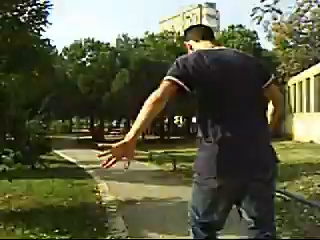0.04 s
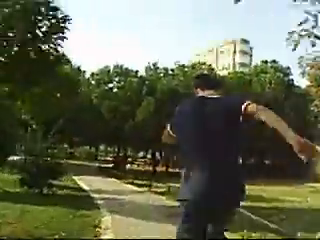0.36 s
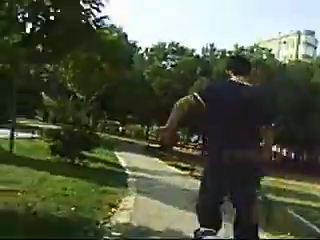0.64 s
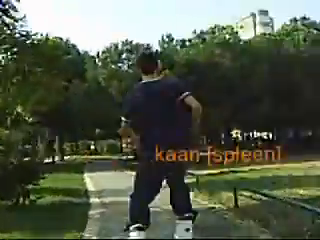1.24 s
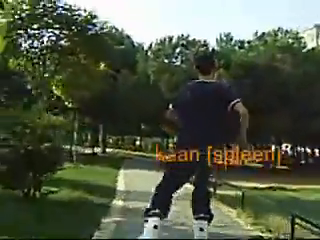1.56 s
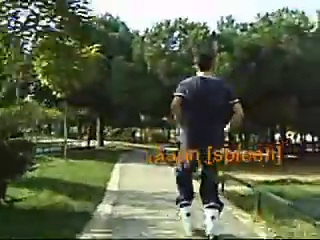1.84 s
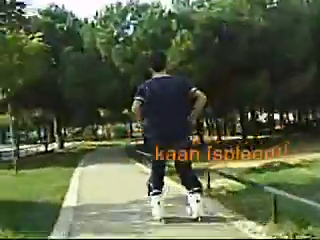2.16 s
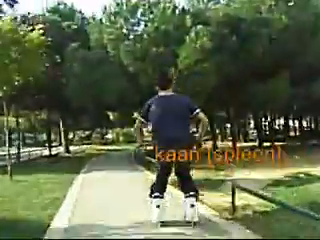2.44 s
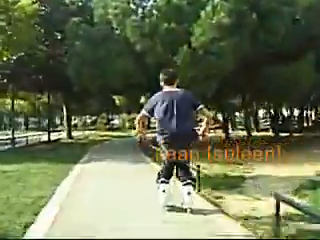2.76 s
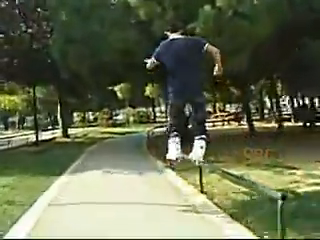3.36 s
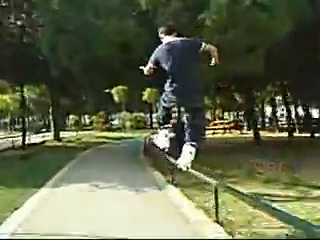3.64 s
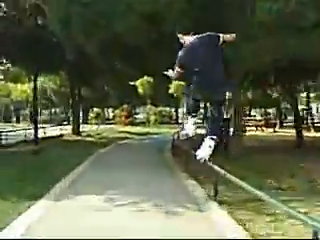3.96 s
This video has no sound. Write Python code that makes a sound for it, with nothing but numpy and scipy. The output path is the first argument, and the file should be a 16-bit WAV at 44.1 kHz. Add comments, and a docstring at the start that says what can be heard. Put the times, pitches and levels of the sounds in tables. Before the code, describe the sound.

Inline skates roll and clack along a paved path, then strike a steel rail.

```python
"""A short pop, then inline skates rolling on a paved park path, followed by a small camera.
Stones in the paving drive the wheels' hum and crackle; the skates slap, clack and scuff with each stride.
Near 3.3 s the frames hit a steel rail, which rings briefly while the rolling goes on."""
import sys
import numpy as np
from scipy import signal
from scipy.fft import rfft, irfft
from scipy.io import wavfile

SR = 44100
rng = np.random.default_rng(int(sys.argv[2]) if len(sys.argv) > 2 else 0)


def wav_record(signal):
    """Record a signal, one row per channel, as 16-bit PCM in the file named by sys.argv[1]."""
    frames = np.transpose(np.atleast_2d(signal))
    bounded = np.clip(frames, -1, 1)
    # unit amplitude maps onto the largest positive 16-bit level
    quanta = np.round(bounded * 32767).astype(np.int16)
    wavfile.write(sys.argv[1], SR, quanta)


N = 176400
T = np.arange(N) / SR
LEAD_S = .008
HIT_T = T[:SR // 20] - LEAD_S  # contact time axis, 0 at the peak

# wheel resonance, rising as a stride loads the wheels: t/s, f/Hz
WHEEL_PITCH = [(.37, 480), (.44, 500), (.6, 516), (.9, 443), (1.3, 476), (1.45, 580), (1.72, 646),
               (1.95, 527), (2.33, 482), (2.47, 590), (2.55, 624), (2.75, 505), (2.96, 504), (3.1, 520),
               (3.21, 542), (3.3, 482), (3.42, 493), (3.65, 470), (3.88, 498), (4, 450)]
# wheel hum: t/s, level/dB
HUM_LEVEL = [(.17, -49), (.36, -75), (.378, -29.5), (.49, -35), (.9, -39), (1.12, -45), (1.395, -53),
             (1.42, -33.5), (1.69, -35), (1.77, -41.5), (2.41, -46.5), (2.51, -29.5), (2.79, -36),
             (2.87, -32), (2.98, -31.5), (3.03, -33), (3.11, -32), (3.25, -32), (3.62, -34), (3.84, -33),
             (3.91, -31), (4, -33.5)]
# grit under the wheels: t/s, level/dB
GRIT_LEVEL = [(.17, -40.5), (.35, -39.5), (.385, -32.5), (.5, -35.5), (.66, -39), (.86, -39), (1.12, -38),
              (1.38, -41), (1.43, -33.5), (1.6, -41.5), (1.68, -38), (1.79, -39.5), (1.98, -39),
              (2.28, -38.5), (2.41, -37), (2.45, -34), (2.75, -35.5), (3.4, -36.5), (4, -35)]
# rasp of wheels pushed sideways: t/s, level/dB
RASP_LEVEL = [(.17, -46), (.4, -58), (.7, -58), (1.35, -43.5), (1.44, -36), (1.7, -39.5), (1.82, -48.5),
              (1.95, -36), (2.35, -44.5), (2.52, -38.5), (2.8, -48), (3.25, -37.5), (4, -55)]
# loaded skate set down: t/s, slap/dB, wheel f/Hz, thud/dB, boom/dB
LANDINGS = [(.3715, -22.5, 497, -23, -50), (1.4105, -16.5, 650, -21.5, -45.5),
            (2.4272, -21, 475, -29, -42.5)]
# wheels and frames striking: t/s, crack/dB, shell f/Hz, shell/dB, thud/dB
CLACKS = [(0.1728, -30, 2020, -42, -35), (0.214, -33.5, 1840, -33, -35.5), (0.3934, -29, 2070, -35, -34),
          (.4142, -31, 2780, -31.5, -48), (0.53, -17.5, 2080, -17.5, -32), (0.66, -36, 2060, -35, -40),
          (.951, -35, 2100, -36.5, -33.5), (1.0738, -38, 1750, -36, -33), (1.1398, -44, 1910, -38.5, -55),
          (1.2502, -38, 1800, -39, -29.5), (1.282, -27, 2120, -26.5, -33.5), (1.3941, -38, 1430, -37, -50),
          (1.556, -39, 1820, -35, -34), (1.685, -38.5, 2000, -35, -40), (1.911, -40, 2450, -39.5, -32.5),
          (2.059, -37, 2120, -38, -39), (2.3693, -39, 1890, -36, -38), (2.4984, -40, 1920, -38, -37),
          (2.898, -34, 2070, -31, -55), (3.5192, -38, 2110, -37, -56)]
# sideways skids: peak t/s, level/dB, rise/s, decay/s
SCUFFS = [(.43, -40.5, 0.037, 0.14), (0.747, -27.5, 0.014, 0.03), (1.245, -34.5, 0.03, 0.045),
          (1.5, -44, 0.052, 0.21), (1.909, -36.5, 0.0018, 0.087), (2.13, -42.5, 0.017, 0.043)]
# frames hitting the rail: t/s, level/dB, shell f/Hz, shell/dB
RAIL_HITS = [(3.2838, -24.5, 1900, -30), (3.2924, -23, 1820, -29.5), (3.2952, -23, 1910, -22),
             (3.2981, -27, 2100, -39), (3.304, -24, 2580, -25), (3.3303, -32.5, 2000, -34)]
# wheels dropping over dips: t/s, f/Hz, level/dB
BUMPS = [(.411, 406, -24), (.438, 430, -30), (1.648, 653, -29), (2.535, 660, -24.5), (2.557, 208, -31),
         (2.911, 480, -27), (2.931, 435, -27), (2.979, 498, -22), (3.165, 534, -27.5), (3.209, 590, -24),
         (3.372, 517, -29), (3.908, 425, -28)]
# single stones snapping: t/s, level/dB
TICKS = [(.3708, -27.5), (.4395, -45), (.455, -39), (.4675, -34), (.508, -37), (.617, -40), (.7456, -29.5),
         (1.19, -39), (1.2125, -41), (1.233, -41), (1.2446, -26), (1.484, -38), (1.615, -41),
         (1.649, -39.5), (1.963, -38), (1.98, -37), (2.132, -40)]

# plastic shell modes: pitch ratio, gain/dB
SHELL_MODES = [(1.001, 9), (1.21, -1), (1.6, -9), (2.72, -5.5)]
# wheel modes: pitch ratio, gain/dB
WHEEL_MODES = [(.58, -7.5), (1, 3), (1.55, -4.5), (2.2, -2.5)]
# steel rail modes: f/Hz, gain/dB, t60/s
RAIL_MODES = [(1860, -4, 0.19), (2000, -6, .15), (2380, -10, 0.34), (2680, -6, .18), (3000, -7, 0.27),
              (3148, -7, .2), (3865, -10, .35), (4000, -11, .28), (4120, -10, 0.24), (4857, -10, .16),
              (5372, -10, .22), (5840, -13, .3)]

# grit spectrum: f/Hz, gain/dB
GRIT_EQ = [(40, -64.5), (150, -12.5), (300, 7.5), (900, 2.5), (1300, -0.5), (2100, -4), (3000, -8.5),
           (4200, -14.5), (6300, -12), (7600, -10)]
# rasp spectrum: f/Hz, gain/dB
RASP_EQ = [(40, -38), (450, -15.5), (800, 2.5), (1300, 0), (2000, -4.5), (2800, -21.5), (7600, -15)]
# rumble spectrum: f/Hz, gain/dB
RUMBLE_EQ = [(20, 1), (60, -18), (110, 4.5), (200, 10), (330, -5), (600, 4.5), (1500, -12), (7600, -53)]
# landing slap spectrum: f/Hz, gain/dB
SLAP_EQ = [(40, -8), (200, -9), (620, 7.5), (1100, 3.5), (1600, 9), (2200, 4), (2550, -6), (3500, -8.5),
           (4600, -14.5), (6200, -2), (7600, -13)]
# clack spectrum: f/Hz, gain/dB
CLACK_EQ = [(40, -41), (400, -2.5), (1100, 1), (1500, 2.5), (2050, 8), (2600, 6.5), (3200, 3), (4600, -.5),
            (5800, 3.5), (7600, -10)]
# skid and stone tick spectrum: f/Hz, gain/dB
SCUFF_EQ = [(40, -71), (400, 0.5), (1000, 0.5), (2000, 3), (2800, -0.5), (4000, -7), (5600, -5),
            (7600, -16.5)]
# rail knock spectrum: f/Hz, gain/dB
KNOCK_EQ = [(40, -35), (500, -0.5), (1400, -1.5), (1950, 6), (2700, 5), (3200, 2), (4300, -1), (6100, 2.5),
            (6700, -11)]
# rail scrape spectrum: f/Hz, gain/dB
SCRAPE_EQ = [(40, -45), (900, -19), (1900, 1), (2700, 1), (4200, 1), (5800, -1), (7600, -30)]
# filter on the camera's mirrored treble: f/Hz, gain/dB
IMAGE_EQ = [(40, 8), (8500, -1), (9500, -3), (10800, -5), (11500, -8), (12100, -11), (14000, -2)]


def rolling(rumble_db=-50):
    """The paving drives the wheels' resonance, a gritty hiss, a coarse rasp and a low rumble."""
    hz = curve(WHEEL_PITCH) * (1 + .019 * waver(rate_hz=12))
    hum = resonate(paving(), hz, width_hz=204)
    hum = unit(resonate(hum, hz, width_hz=374)) * amp(curve(HUM_LEVEL))
    stones = paving() * amp(waver(rate_hz=38))
    grit = unit(colour(stones, GRIT_EQ)) * amp(curve(GRIT_LEVEL))
    rasp = unit(colour(paving(), RASP_EQ)) * amp(curve(RASP_LEVEL) + 1.2 * waver(rate_hz=67))
    rumble = unit(colour(paving(), RUMBLE_EQ)) * amp(rumble_db + 2.1 * waver(rate_hz=45))
    return hum + grit + rasp + rumble


def paving(stone_share=.67):
    """Tiny stones of uneven size meet the wheels over a fine roughness."""
    stones = impulses(per_s=1300, spread_db=1.53, max_spreads=5)
    return np.sqrt(stone_share) * stones + np.sqrt(1 - stone_share) * rng.standard_normal(N)


def landings(boom_hz=124, width_hz=250, rise_s=.013):
    """A loaded skate meets the path: dull slap, wheel thud, short low boom."""
    out = np.zeros(N)
    boom = unit(resonate(resonate(paving(), boom_hz, width_hz), boom_hz, width_hz))
    for s, slap_db, hz, thud_db, boom_db in LANDINGS:
        slap = amp(slap_db) * crack(SLAP_EQ, decay_s=.003)
        add(out, s - LEAD_S, slap + amp(thud_db) * wheel_thud(hz))
        out += boom * swell(s + 2 * rise_s, boom_db, rise_s, decay_s=.06) * (T > s)
    return out


def clacks():
    """Wheels and frames strike: a snap with a low thump, shell ring, wheel thud."""
    out = np.zeros(N)
    for s, crack_db, shell_hz, shell_db, thud_db in CLACKS:
        snap = amp(crack_db) * (crack(CLACK_EQ, decay_s=.0023) + amp(-12.5) * low_thump())
        shell = amp(shell_db) * shell_ring(shell_hz)
        thud = amp(thud_db) * wheel_thud(hz=647)
        add(out, s - LEAD_S, snap + shell + thud)
    return out


def scuffs():
    """Skidding wheels grip and slip in swells of gritty friction."""
    slips = impulses(per_s=1100, spread_db=2, max_spreads=3)
    friction = unit(colour(slips + amp(-2.5) * paving(), SCUFF_EQ))
    return friction * sum(swell(*row) for row in SCUFFS)


def rail(ring_gain_db=-15.5):
    """Frames chatter onto the steel tube and scrape along it; it rings, damped by the skates."""
    out, t = np.zeros(N), T[:SR // 2]
    for s, db, shell_hz, shell_db in RAIL_HITS:
        steel = sum(amp(mode_db - 60 * t / t60_s) * sine(hz, t) for hz, mode_db, t60_s in RAIL_MODES)
        knock = crack(KNOCK_EQ, decay_s=.0016) + amp(-16) * low_thump()
        add(out, s - LEAD_S, amp(db) * knock + amp(shell_db) * shell_ring(shell_hz))
        add(out, s, amp(db + ring_gain_db) * steel)
    scrape = unit(colour(paving(), SCRAPE_EQ) * amp(waver(rate_hz=330)))
    return out + scrape * swell(peak_s=3.31, db=-35, rise_s=.04, decay_s=.062)


def bumps():
    """Wheels knock dully on uneven paving."""
    out = np.zeros(N)
    for s, hz, db in BUMPS:
        add(out, s - LEAD_S, amp(db) * ring(hz, decay_s=.0064))
    return out


def ticks():
    """Stones snap out from under the wheels."""
    out = np.zeros(N)
    for s, db in TICKS:
        add(out, s - LEAD_S, amp(db) * crack(SCUFF_EQ, decay_s=.00068))
    return out


def shell_ring(hz):
    """The struck plastic shell rings very briefly."""
    return ring(hz, decay_s=.001, modes=SHELL_MODES)


def wheel_thud(hz):
    """Struck wheels thud in damped modes."""
    return ring(hz, decay_s=.0025, modes=WHEEL_MODES)


def low_thump():
    """Brief low thump under each hit."""
    return ring(hz=42, decay_s=.0095)


def crack(eq, decay_s, echo_s=.00095, echo_db=-3):
    """Contact snap: a noise burst, coloured by the skate, made hollow by its ground echo."""
    burst = rfft(strike(decay_s) * rng.standard_normal(len(HIT_T)))
    burst /= abs(burst) ** (1 / 3)  # partly flattens the spectrum
    delay_s = echo_s * rng.uniform(.85, 1.15)
    hz = np.fft.rfftfreq(len(HIT_T), 1 / SR)
    echo = amp(echo_db) * np.exp(-2j * np.pi * hz * delay_s)
    return unit_hit(colour(irfft((1 + echo) * burst, len(HIT_T)), eq))


def ring(hz, decay_s, modes=((1, 0),)):
    """Heavily damped modes on one pitch."""
    return unit_hit(strike(decay_s) * sum(amp(db) * sine(hz * ratio, HIT_T) for ratio, db in modes))


def strike(decay_s, rise_s=.00072):
    """Contact envelope: the load builds fast, then dies away."""
    return np.exp(-np.maximum(-HIT_T / rise_s, HIT_T / decay_s))


def park(x, wet_db=-17, t60_s=.072, echoes_per_s=2000, predelay_s=.004):
    """Faint, short scatter from ground and trees."""
    t = T[:SR // 2]
    echoes = rng.standard_normal(len(t)) * (rng.random(len(t)) < echoes_per_s / SR)
    tail = echoes * (t > predelay_s) * amp(-60 * t / t60_s)
    return x + amp(wet_db) * signal.fftconvolve(x, tail / np.linalg.norm(tail))[:N]


def impulses(per_s, spread_db, max_spreads):
    """Random impulses of uneven size, rms 1."""
    size = amp(spread_db * np.minimum(rng.exponential(1, N), max_spreads))
    return unit(size * rng.choice([-1, 1], N) * (rng.random(N) < per_s / SR))


def sine(hz, t):
    """Sine with random phase."""
    return np.sin(2 * np.pi * (hz * t + rng.random()))


def swell(peak_s, db, rise_s, decay_s):
    """Exponential rise and fall."""
    return amp(db) * np.exp(-np.maximum((peak_s - T) / rise_s, (T - peak_s) / decay_s))


def waver(rate_hz):
    """Low-passed random drift, rms 1."""
    hz = np.fft.rfftfreq(N, 1 / SR)
    return unit(irfft(rfft(rng.standard_normal(N)) / (1 + (hz / rate_hz) ** 2) ** 2, N))


def resonate(x, hz, width_hz):
    """Resonance that follows hz."""
    carrier = np.exp(2j * np.pi * np.cumsum(hz * np.ones(len(x))) / SR)
    pole = np.exp(-np.pi * width_hz / SR)
    return 2 * (carrier * signal.lfilter([1 - pole], [1, -pole], x / carrier + 1e-18)).real


def colour(x, eq):
    """Minimum-phase filter through (f/Hz, gain/dB) points."""
    hz, db = np.transpose(eq)
    bins_hz = abs(np.fft.fftfreq(2048, 1 / SR)) + 1
    log_gain = np.log(amp(np.interp(np.log(bins_hz), np.log(hz), db)))
    taps = np.fft.ifft(np.exp(np.conj(signal.hilbert(log_gain)))).real
    return signal.fftconvolve(x, taps)[:len(x)]


def lowpass(x, hz):
    """Steep low-pass."""
    return signal.fftconvolve(x, signal.firwin(701, hz, window=("kaiser", 8), fs=SR), "same")


def curve(points):
    """Straight lines through (t/s, value) points."""
    return np.interp(T, *np.transpose(points))


def add(mix, start_s, sound):
    """Mixes a sound in."""
    part = mix[max(round(start_s * SR), 0):][:len(sound)]
    part += sound[:len(part)]


def amp(db):
    """Decibels to gain."""
    return 10 ** (np.asarray(db) / 20)


def unit(x):
    """Scales to rms 1."""
    return x / np.sqrt(np.mean(x ** 2) + 1e-20)


def unit_hit(x, span_s=.006):
    """Scales to the energy of rms 1 over span_s."""
    return x / np.sqrt(np.sum(x ** 2) / (span_s * SR) + 1e-20)


def scene():
    """Skates on path and rail, in open air; mono."""
    return park(rolling() + scuffs() + landings() + clacks() + ticks() + bumps() + rail())[None]


def record(dry, start_s=.1655, dc_offset=-.059, ceiling=.5, sample_hz=16000):
    """The camera starts with a pop and an offset and rounds peaks; its low rate mirrors treble upward."""
    x = lowpass(ceiling * np.tanh(dry[0] / ceiling), hz=7660)
    image = colour(x * 2 * np.cos(2 * np.pi * sample_hz * T), IMAGE_EQ)
    x = (x + image + dc_offset) * (T > start_s)
    pop = amp(-27) * ring(hz=485, decay_s=.00027)
    add(x, start_s - LEAD_S, pop)
    return lowpass(x, hz=12900)[None]


dry = scene()
out = record(dry)
wav_record(out)
```